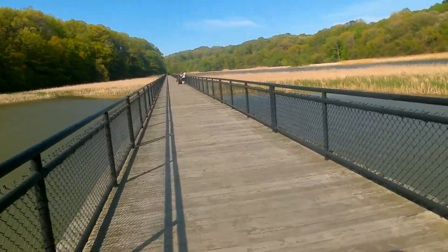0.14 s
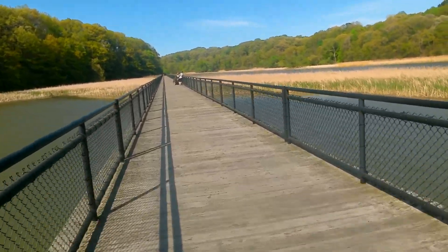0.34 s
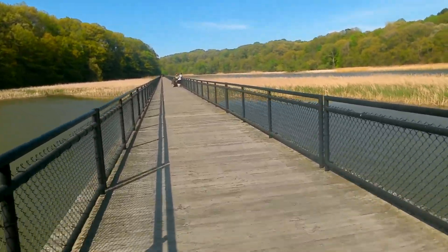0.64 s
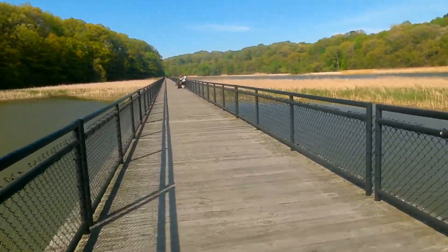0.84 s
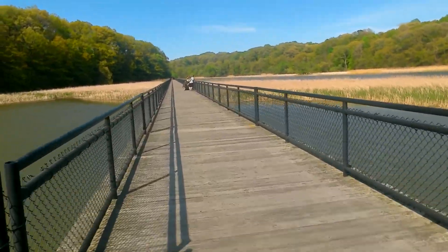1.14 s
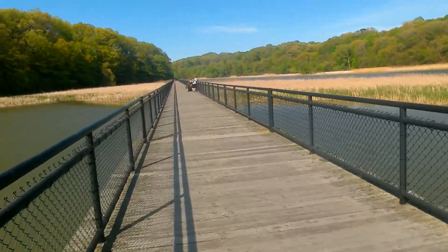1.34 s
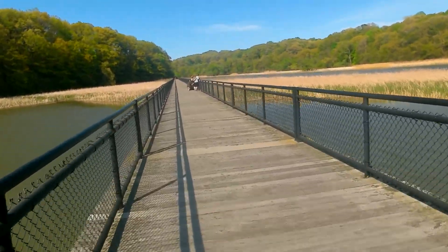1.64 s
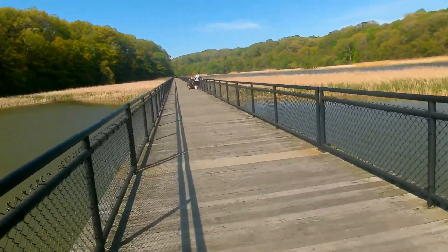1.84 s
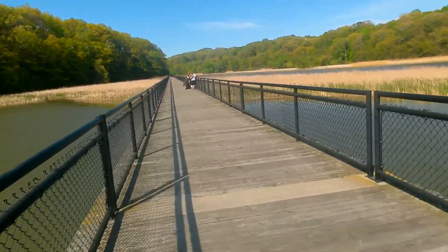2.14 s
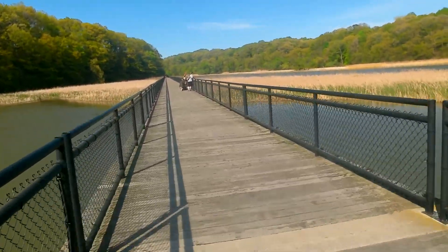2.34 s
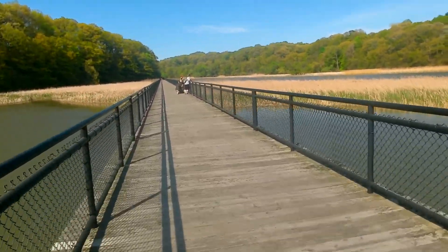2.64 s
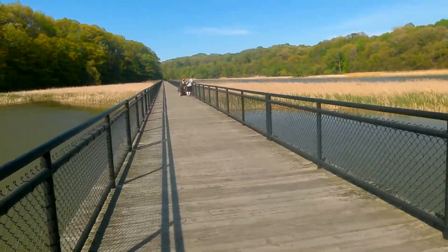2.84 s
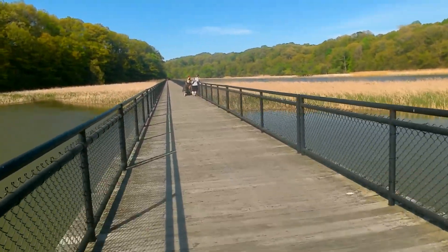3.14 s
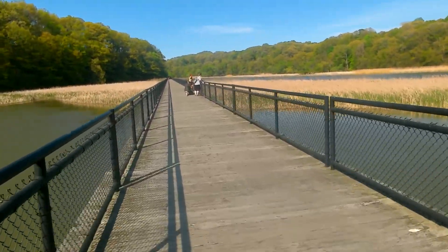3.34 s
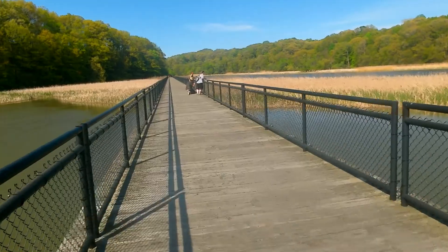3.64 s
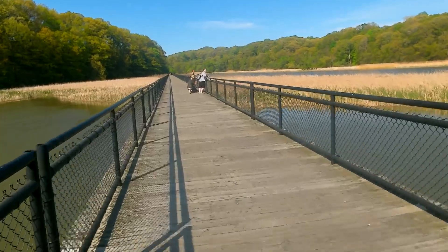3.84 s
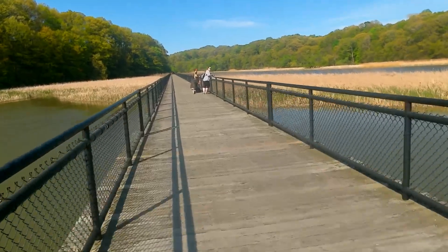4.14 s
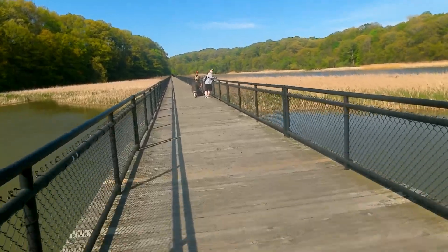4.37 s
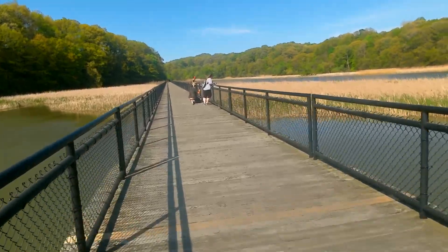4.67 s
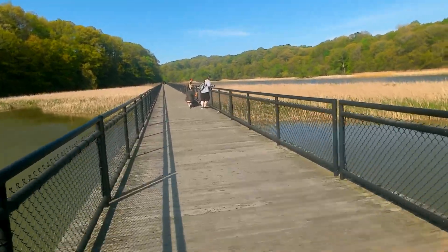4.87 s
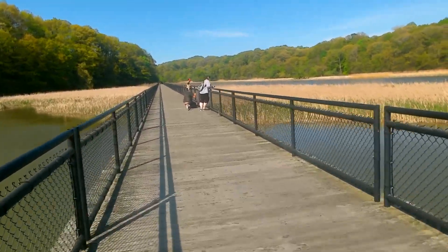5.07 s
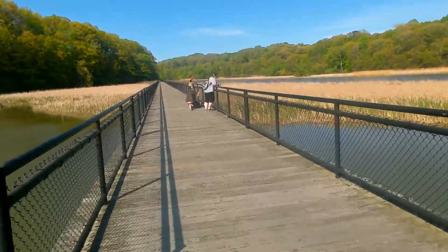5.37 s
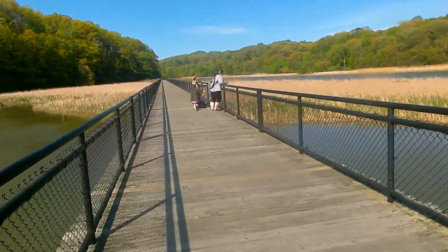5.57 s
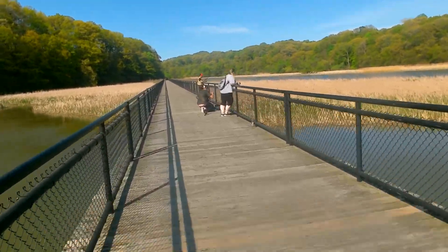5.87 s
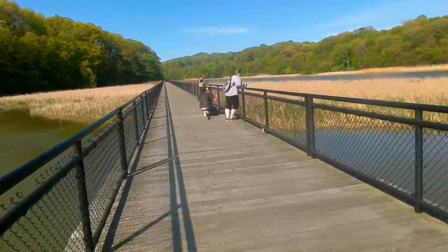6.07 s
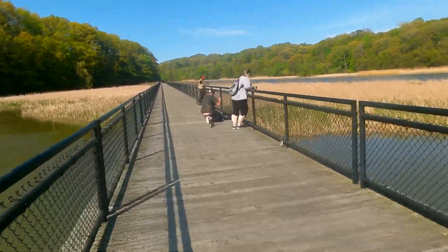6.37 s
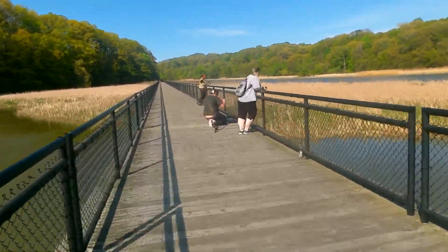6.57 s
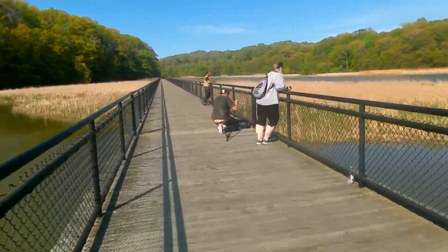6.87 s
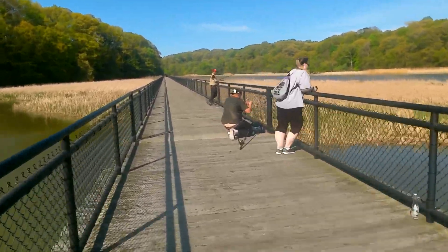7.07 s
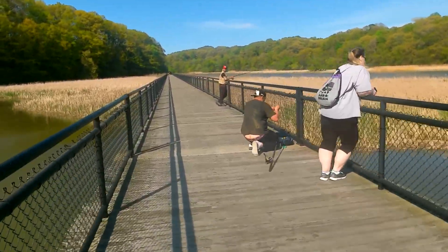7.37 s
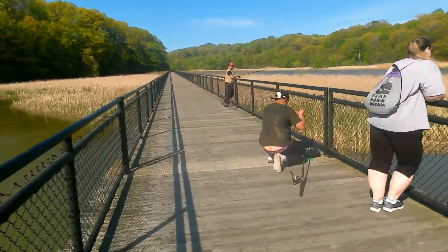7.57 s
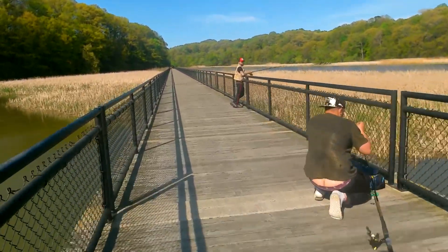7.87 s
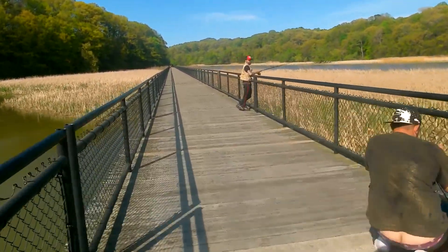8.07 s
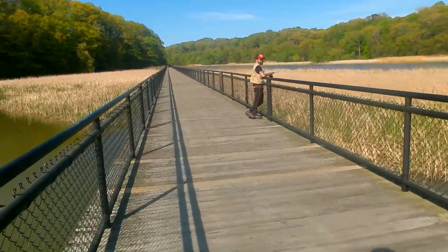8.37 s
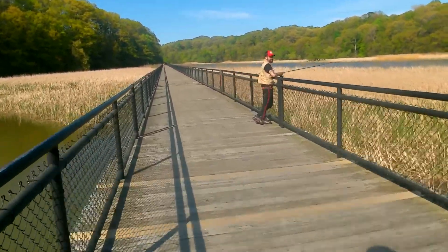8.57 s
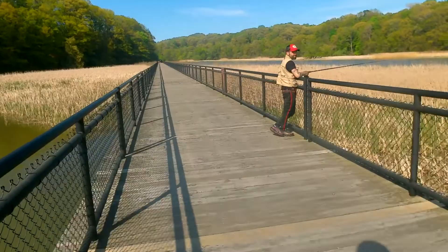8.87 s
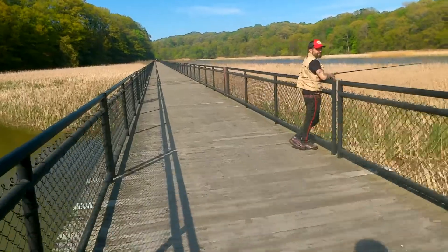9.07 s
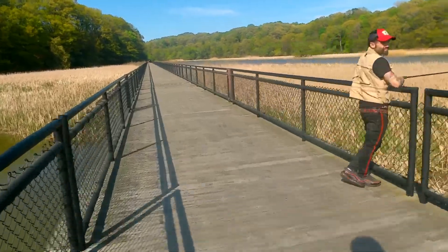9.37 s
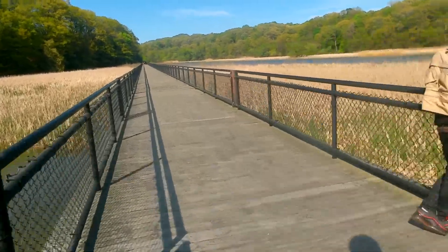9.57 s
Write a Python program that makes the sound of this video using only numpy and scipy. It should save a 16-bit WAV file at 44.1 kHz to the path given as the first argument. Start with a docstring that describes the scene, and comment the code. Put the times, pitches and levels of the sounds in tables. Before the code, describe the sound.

For about ten seconds a scooter rolls steadily over a wooden boardwalk, heard from a microphone on board. A low, hollow plank drumming and rough tyre roar run throughout, slightly easing later, while gusting wind rumbles deeply, strong near 2 s. Thumps cluster at 0.5-0.9 s; sharp wooden slaps follow around 2 s, frame thuds at 2.8-3.4 s and a heavy boom at 4.3 s. Dull steering knocks and tiny metallic ticks scatter throughout, with short rattles near 1.4, 5.1 and 8.8 s. Around 4.6-5.3 s a thin hiss and faint falling bird trill swell and fade. Isolated faint whistles appear near 2.1, 3.3, 5.1, 6.6 and 7.4-8.2 s. A barely audible, very high whine flickers at 6.2 s. Thuds continue around 6.2-7.8 s, a strong clack hits at 8.7 s, and hard slaps and booms come at 9.4-9.6 s.

```python
"""Wheels drum over wooden planks and thump on the raised ones while wind buffets the microphone.
A scooter rolls at a steady pace along a boardwalk over a marsh: shaped noise and ringing planks.
Its loose parts clack, tick and rattle: damped modes and noise scraped through resonances.
Behind: a thin hiss, a brief high whine, faint bird whistles and a trill, all but the hiss gliding sines."""
import sys
import numpy as np
from scipy import signal
from scipy.fft import rfft, irfft, next_fast_len
from scipy.io import wavfile
from scipy.ndimage import uniform_filter1d, minimum_filter1d, map_coordinates

SR = 44100
rng = np.random.default_rng(int(sys.argv[2]) if len(sys.argv) > 2 else 0)


def dump(signal):
    """Clip the signal to [-1, 1] and save it as 16-bit WAV at the path in sys.argv[1]."""
    limited = np.clip(np.atleast_2d(signal).T, -1, 1)
    pcm = np.round(limited * 32767).astype(np.int16)
    wavfile.write(sys.argv[1], SR, pcm)


N = 428211


def amp(db):
    """Decibels to gain."""
    return 10 ** (np.asarray(db) / 20)


def unit(x):
    """Scaled to rms 1."""
    return x / np.sqrt(np.mean(x ** 2) + 1e-20)


def crest(x):
    """Scaled to peak 1."""
    return x / (np.abs(x).max() + 1e-20)


def smooth(x, size):
    """Two moving averages of size samples in a row."""
    return uniform_filter1d(uniform_filter1d(x, size=size), size=size)


def add(track, start_s, sound):
    """Mix a sound into the track at start_s."""
    part = track[max(round(start_s * SR), 0):][:len(sound)]
    part += sound[:len(part)]


def curve(rows, outside=None):
    """Per-sample line through (s, value) rows; beyond them the end values, or outside if given."""
    s, value = np.transpose(rows)
    return np.interp(np.arange(N) / SR, s, value, left=outside, right=outside)


def wobble(rate_hz):
    """A smooth random curve, rate_hz knots a second."""
    knots = rng.standard_normal(int(N * rate_hz / SR) + 4)
    return map_coordinates(knots, [np.arange(N) * rate_hz / SR])


def tone(hz):
    """Sine that follows a per-sample frequency."""
    return np.sin(2 * np.pi * np.cumsum(hz) / SR)


def coloured(x, spectrum, size=8192):
    """x through a causal minimum-phase filter with the gain of the (Hz, dB) points."""
    hz, db = np.transpose(spectrum)
    bin_hz = np.fft.rfftfreq(size, 1 / SR)
    log_gain = np.log(amp(np.interp(np.log(bin_hz + 1), np.log(hz), db)))
    # folding the cepstrum onto positive times makes the filter causal
    cepstrum = irfft(log_gain)
    cepstrum[1:size // 2] *= 2
    cepstrum[size // 2 + 1:] = 0
    return signal.fftconvolve(x, irfft(np.exp(rfft(cepstrum))))[:len(x)]


def resonate(x, hz, width_hz):
    """x through one resonance."""
    return signal.lfilter(*signal.iirpeak(min(hz, SR / 3), hz / width_hz, SR), x)


def pressure(t, t60_s, rise_s):
    """Force of a contact: it builds as the parts press together, then dies away."""
    return amp(-60 * t / t60_s) * (1 - np.exp(-(t / rise_s) ** 2))


def burst(t, t60_s, rise_s):
    """The noise of one contact."""
    return rng.standard_normal(len(t)) * pressure(t, t60_s, rise_s)


def ringing(modes, t, stiffness, rise_s):
    """Damped modes, pitched by stiffness and struck a little differently each time; peak 1."""
    ring = np.zeros(len(t))
    for hz, db, t60_s in modes:
        decay = amp(db + rng.normal(0, 1.6) - 60 * t / t60_s)
        ring += decay * np.sin(2 * np.pi * hz * stiffness * t)
    return crest(ring * (1 - np.exp(-t / rise_s)))


def bumps(rate_hz, spread_db):
    """Impulses at random moments, rate_hz a second on average, of uneven size."""
    hits = rng.random(N) < rate_hz / SR
    return hits * amp(spread_db * np.clip(rng.standard_normal(N), -2, 2))


def chatter(blows, t60_s):
    """Envelope of the short bursts that a run of impulses shakes out; rms 1."""
    energy = signal.lfilter([1], [1, -amp(-120 / (t60_s * SR))], blows ** 2)
    return unit(np.sqrt(energy))


def strays(rate_hz, db, spread_db):
    """Small jolts at random moments, about rate_hz a second: rows of (s, dB, random colour around 0)."""
    chance = rng.standard_normal((100, 3))
    times_s = np.cumsum(np.exp(.7 * chance[:, 0])) / (1.28 * rate_hz)  # 1.28: mean of the gaps
    level_db = db + spread_db * np.clip(chance[:, 1], -2, 1)
    return np.column_stack([times_s, level_db, chance[:, 2]])[times_s < N / SR]


def rolling():
    """Plank edges drum the deck and roughen the tyre roar; the fittings jiggle on their own; all grow with the
    level."""
    # How hard the wheels work the deck. Each row: time in seconds, level in dB.
    effort_rows = [(0, -18), (0.45, -21.5), (0.7, -18.5), (0.82, -20), (1.1, -21), (1.8, -20.5),
                   (2.15, -18), (2.7, -21.5), (3.3, -20.5), (3.95, -23.5), (4.3, -21.5), (5.0, -21),
                   (5.95, -24), (6.3, -22), (7.2, -24), (7.7, -22), (8.15, -24.5), (9.3, -25.5),
                   (9.71, -20.5)]
    # Deck drumming. Each row: frequency in Hz, gain in dB.
    drum_spectrum = [(30, -41), (75, -17), (106, 3.5), (135, -2.5), (170, 0), (290, -2), (400, -8.5),
                     (600, -16), (1000, -31), (2500, -61), (6000, -120)]
    # Tyre roar. Each row: frequency in Hz, gain in dB.
    tyre_spectrum = [(100, -41), (330, -6.5), (560, 0), (700, -4), (900, -5.5), (1250, -13.5),
                     (1500, -18.5), (1780, -23.5), (1950, -25), (2400, -37.5), (3500, -45.5), (8000, -79.5)]
    # Tyre hiss. Each row: frequency in Hz, gain in dB.
    hiss_spectrum = [(800, -36), (2400, -5.5), (3200, 1.5), (4500, -2), (5300, -1), (6200, -4.5),
                     (7000, -10), (9000, -10), (12000, -12.5), (15500, -14)]
    cruise_db = -21
    board_rate_hz, board_depth_db = 12, 1.21  # smoother and rougher boards
    drum_db, tyre_db, hiss_db = -21.5, -29, -62  # at the cruising level
    drum_growth, tyre_growth, hiss_growth = 0.95, 0.81, 0.44  # dB per dB of effort
    jiggle_db, grit_db = 2, -3  # re hiss

    effort_db = curve(effort_rows) - cruise_db + board_depth_db * wobble(board_rate_hz)
    edges = seams(rate_hz=27, scatter=.4, spread_db=3.5)

    knocks = unit(edges - edges.mean())
    drum = unit(coloured(rng.standard_normal(N) + 0.19 * knocks, drum_spectrum))
    drum = unit(drum + .5 * planks(edges, low_hz=136.5, high_hz=367.9, t60_s=0.26))

    tread = (chatter(edges, t60_s=0.18) + 1.02) * rng.standard_normal(N)
    plank_tones = planks(edges, low_hz=415.8, high_hz=1001.0, t60_s=0.22)
    roar = unit(unit(coloured(tread, tyre_spectrum)) + 0.34 * plank_tones)

    hiss = unit(coloured(rng.standard_normal(N), hiss_spectrum))
    shaking = chatter(bumps(rate_hz=48, spread_db=7.0), t60_s=0.095) * amp(5.1 * np.tanh(wobble(21)))
    jiggle = unit(fitting(shaking, bright_db=-19.5))
    grit = crackle(rate_hz=42, spread_db=4.5, low_hz=2000, high_hz=6260, t60_s=0.016)
    treble = hiss + amp(jiggle_db) * jiggle + amp(grit_db) * grit

    return (amp(drum_db + drum_growth * effort_db) * drum
            + amp(tyre_db + tyre_growth * effort_db) * roar
            + amp(hiss_db + hiss_growth * effort_db) * treble)


def seams(rate_hz, scatter, spread_db):
    """One impulse for each plank edge that the front and the rear wheel cross."""
    count, wheel_lag_s = 800, .18
    chance = rng.standard_normal((count, 3))
    rear_s = (np.arange(count) + scatter * chance[:, 0]) / rate_hz
    front_s = rear_s - wheel_lag_s
    height_db = spread_db * np.clip(chance[:, 1], -2, 1.5)
    at = (np.concatenate([rear_s, front_s]) * SR).astype(int)
    sizes = amp(np.concatenate([height_db, height_db + chance[:, 2]]))
    return np.bincount(at[at >= 0], sizes[at >= 0], N)[:N]


def planks(edges, low_hz, high_hz, t60_s):
    """Each crossed edge rings briefly at a random pitch of its own; rms 1."""
    out, t = np.zeros(N), np.arange(SR // 6) / SR
    fade = amp(-60 * t / t60_s)
    pitches_hz = rng.uniform(low_hz, high_hz, size=1600)
    for at, hz in zip(np.flatnonzero(edges), pitches_hz):
        add(out, at / SR, edges[at] * fade * np.sin(2 * np.pi * hz * t))
    return unit(out)


def crackle(rate_hz, spread_db, low_hz, high_hz, t60_s):
    """Grains of grit pop under the tyres, each at its own pitch; rms 1."""
    out, t = np.zeros(N), np.arange(SR // 40) / SR
    pops = bumps(rate_hz, spread_db)
    for at in np.flatnonzero(pops):
        hz = rng.uniform(low_hz, high_hz)
        pop = resonate(burst(t, t60_s, rise_s=0.00018), hz, width_hz=1400)
        add(out, at / SR, pops[at] * crest(pop))
    return unit(coloured(out, [(1500, -6), (2500, 3), (6000, -6.0), (7200, -7.5), (14000, -10.0)]))


def thumps():
    """A raised plank cracks and slaps, rings the frame and booms the deck; stiffness lifts ring and slap."""
    # Wheels hitting raised planks. Each row: start in seconds, frame ring in dB, deck boom in dB,
    # wooden slap in dB, stiffness as a pitch ratio.
    hits = [(0.087, -8, -24, -31, 0.9), (0.561, -16, -11, -18, 1.13), (0.576, -18, -13, -31, 0.97),
            (0.619, -13, -14, -41, 0.88), (0.665, -7, -14, -17, 0.69), (0.693, -9.5, -18, -15.5, 1.01),
            (0.728, -6.5, -20, -14.5, 0.94), (0.753, -3, -23, -24, 0.74), (0.855, -21, -12.5, -30, 0.86),
            (1.154, -16, -27, -16, 0.96), (1.418, -15, -28, -20, 1.05), (1.432, -16, -19, -22, 0.97),
            (1.972, -11.5, -27, -16.5, 1.17), (1.985, -7.5, -26, -12, 1), (2.018, -14, -27, -4, 0.93),
            (2.04, -13, -18, -21, 0.96), (2.147, -19, -33, -11, 1), (2.177, -23, -32, -17, 1.06),
            (2.192, -11, -24, -15.5, 1), (2.815, -11, -17, -13, 0.66), (2.852, -8, -17, -17, 0.69),
            (3.085, -2.5, -16, -7.5, 1), (3.101, 2.5, -18, -10, 0.85), (3.268, -17, -16, -17, 0.79),
            (3.312, -4.5, -11, -24, 0.71), (3.346, -5.5, -15, -35, 0.587), (3.417, -17, -30, -32.5, 0.91),
            (3.793, -10.5, -18, -19, 0.86), (4.283, -7.5, -7, -19, 0.78), (4.345, -13.5, -14.5, -27, .75),
            (5.509, -24, -13, -38, .7), (5.564, -15, -17, -17.5, 0.86), (6.188, -5.5, -9.5, -29, .95),
            (6.315, -15, -28, -17, 1.14), (6.374, -17, -28, -17, 1.12), (6.642, -11.5, -22, -20, 1.05),
            (6.723, -30, -16.5, -29, 0.82), (6.829, -14, -16, -15, 0.8), (6.864, -8, -15, -25, 0.63),
            (6.905, -11.5, -15, -28, 1.4), (7.053, -19, -25, -18.5, 0.85), (7.081, -15, -18, -19, 0.9),
            (7.476, -2.5, -31, -16.5, 1.09), (7.492, -18, -26, -22, 1.08), (7.666, -5.5, -18, -24, 1.11),
            (7.678, -14, -16, -18, 0.99), (7.768, -15, -14, -33, 0.95), (8.397, -11, -30, -20.5, 0.69),
            (8.733, -20, -15, -41, 0.53), (8.96, -12, -35, -22, 1.02), (9.028, -14, -26, -40, 0.73),
            (9.13, -13, -29, -22, 1.1), (9.196, -19, -19, -34, .7), (9.408, -13.5, -30, -10, 0.96),
            (9.417, -6.5, -28, -13, 0.95), (9.429, -16.5, -17, -15, 1.4), (9.438, -20, -4.5, -23, 1.1),
            (9.591, -3, -11, -8.5, 1.05), (9.597, -19, -8, -8.5, 1.27), (9.617, -21, -12, -18, 1.27)]
    # Frame modes at stiffness 1. Each row: frequency in Hz, mean level in dB, t60 in seconds.
    frame_modes = [(170, -4, 0.11), (248.3, 3, 0.071), (309.7, 0, 0.093), (353, -9.5, 0.081),
                   (438, -5, 0.057)]
    # Plank modes at stiffness 1. Each row: frequency in Hz, mean level in dB, t60 in seconds.
    plank_modes = [(475, 0.5, 0.063), (670.5, -6, 0.088), (858, -2.5, 0.072), (1125, -10, 0.052)]
    # Slap noise at stiffness 1. Each row: frequency in Hz, gain in dB.
    slap_spectrum = [(150, -21.5), (430, 1.5), (620, 9.5), (880, 3), (1250, -11.5), (1900, -22),
                     (2500, -36), (6000, -49), (15000, -77)]
    # First contact with a plank's edge. Each row: frequency in Hz, gain in dB.
    crack_spectrum = [(200, -12), (700, 5.5), (1200, 2.5), (2000, -20), (2800, -32), (5500, -35.5),
                      (10000, -50.5), (15000, -59)]
    boom_lag_s = 0.0084  # the deck gives way after the slap
    crack_db, plank_share = -9, .85  # crack re slap, plank ring re scuff

    out, t = np.zeros(N), np.arange(SR // 4) / SR
    for start_s, ring_db, boom_db, slap_db, stiffness in hits:
        ring = ringing(frame_modes, t, stiffness, rise_s=.002)
        boom_hz = 102 * rng.normal(1, 0.088)
        boom = np.sin(2 * np.pi * boom_hz * t) * amp(-60 * t / 0.082) * (1 - np.exp(-t / 0.0039))
        scuff_spectrum = [(hz * stiffness, db) for hz, db in slap_spectrum]
        scuff = crest(coloured(burst(t, t60_s=.052, rise_s=.0028), scuff_spectrum))
        slap = crest(scuff + plank_share * ringing(plank_modes, t, stiffness, rise_s=0.0021))
        crack = crest(coloured(burst(t, t60_s=0.011, rise_s=0.00065), crack_spectrum))
        add(out, start_s, amp(ring_db) * ring + amp(slap_db) * (slap + amp(crack_db) * crack))
        add(out, start_s + boom_lag_s, amp(boom_db) * crest(boom))
    return out


def clacks():
    """Play in the steering column gives short, dull knocks with a gritty edge, brighter on higher ones."""
    # Loudest knocks. Each row: start in seconds, level in dB ahead of the ring and grit gains,
    # nominal pitch in Hz, nominal t60 in seconds.
    loud = [(0.375, -19.5, 1200, .022), (0.855, -16.5, 930, 0.04), (0.884, -21, 1350, 0.023),
            (1.082, -15.5, 755, 0.031), (1.32, -18, 790, 0.048), (1.364, -17.5, 1080, 0.15),
            (1.4, -17.5, 800, .025), (1.684, -16, 770, 0.017), (1.973, -11, 790, .014),
            (2.105, -23.5, 1390, .022), (2.235, -24, 960, .022), (2.438, -17.5, 736, 0.027),
            (2.647, -23.5, 910, 0.019), (2.975, -15, 880, 0.027), (2.998, -18.5, 1430, 0.065),
            (3.064, -18, 795, 0.022), (3.434, -17, 765, 0.018), (3.854, -19, 1270, .022),
            (4.491, -28, 766, .022), (4.643, -17, 850, 0.015), (5.126, -20, 875, 0.025),
            (5.326, -23.5, 1360, 0.023), (5.597, -15.5, 755, 0.023), (5.707, -21, 1130, 0.02),
            (5.931, -23.5, 845, 0.016), (6.113, -19, 734, .022), (6.376, -17, 900, 0.027),
            (6.876, -19.5, 1070, 0.024), (6.906, -19, 880, 0.017), (7.024, -20, 1170, 0.018),
            (7.2, -21, 790, .022), (7.299, -20, 790, 0.015), (7.501, -14, 1040, 0.016),
            (7.583, -21.5, 1300, 0.027), (7.864, -12.5, 890, 0.052), (7.904, -26.5, 1350, 0.02),
            (8.09, -22.5, 840, 0.045), (8.448, -14.5, 1155, 0.02), (8.473, -13.5, 710, 0.02),
            (8.538, -16.5, 950, 0.023), (8.588, -21, 1130, 0.045), (8.655, -22.5, 1250, 0.049),
            (8.704, -8.5, 1010, 0.024), (8.714, -21, 990, .025), (8.778, -22, 1100, .03),
            (8.823, -22, 1200, 0.034), (9.335, -18, 1140, 0.041), (9.6, -20, 1150, 0.018)]
    # Column modes. Each row: ratio to the nominal pitch, mean level in dB, share of the nominal t60.
    column_modes = [(.68, -8, 0.93), (1, 6, 0.88), (1.329, -6, .7), (1.85, -21, 0.34)]
    # Grit of a knock of 1000 Hz nominal pitch. Each row: frequency in Hz, gain in dB.
    grit_spectrum = [(300, -19.5), (800, 1), (1300, -3.5), (1800, -15.5), (2300, -24), (4000, -36.5),
                     (8000, -56)]
    ring_db, grit_db = -4.5, -4.5
    soft_hz, soft_t60_s = 867, .022  # lesser knocks in between

    out, t = np.zeros(N), np.arange(SR // 8) / SR
    soft = [(start_s, db, soft_hz * np.exp(.2 * colour), soft_t60_s)
            for start_s, db, colour in strays(rate_hz=1.6, db=-27, spread_db=4)]
    for start_s, db, hz, t60_s in loud + soft:
        modes = [(hz * ratio, mode_db, t60_s * share) for ratio, mode_db, share in column_modes]
        knock = ringing(modes, t, 0.95, rise_s=.0012)
        spectrum = [(f * np.sqrt(hz / 1000), gain_db) for f, gain_db in grit_spectrum]
        grit = crest(coloured(burst(t, t60_s=1.25 * t60_s, rise_s=.001), spectrum))
        add(out, start_s, amp(db) * (amp(ring_db) * knock + amp(grit_db) * grit))
    return out


def fitting(force, bright_db, pitch=1):
    """A loose metal part scraped by a force envelope: broad resonances and a bright edge."""
    # Resonances at pitch 1. Each row: frequency in Hz, width in Hz, gain in dB ahead of the body filter.
    resonances = [(1360, 640, 11), (2013, 160, 16.5), (2880, 2160, 6.5), (3910, 860, 9), (4000, 330, 1),
                  (5490, 900, 12), (6500, 500, -20.5)]
    # Bright edge. Each row: frequency in Hz, gain in dB.
    edge_spectrum = [(2000, -28), (5500, 5), (7200, -8), (8700, 1.5), (11000, -6.5), (13000, -18),
                     (16000, -8)]
    scrape, fizz = force * rng.standard_normal((2, len(force)))
    body = np.zeros(len(force))
    for k, (hz, width_hz, db) in enumerate(resonances):
        body += (-1) ** k * amp(db) * resonate(scrape, hz * pitch, width_hz)
    body = coloured(body, [(500, -6.5), (1400, 12.5), (6200, -4.5), (7500, -5), (15000, -18.0)])
    return unit(body) + amp(bright_db) * unit(coloured(fizz, edge_spectrum))


def ticks():
    """Metal fittings jump, snap back and stutter to rest; the lean tilts them from clank to ping."""
    # Loudest clicks. Each row: start in seconds, peak in dB ahead of the lean filter,
    # bright edge re body in dB, lean from dull clank to thin ping in dB.
    clicks = [(0.274, -30.5, -23.5, -2), (0.401, -32, -21, -6), (0.569, -23, -17, -1),
              (0.587, -32.5, -19.5, -2), (0.676, -35, -21, 2), (0.75, -28, -22.5, -3),
              (0.799, -26, -14.5, 5), (0.882, -30.5, -22, -4), (1.06, -34, -18.5, -2), (1.287, -36, -17, 4),
              (1.336, -19.5, -19.5, 0.5), (1.360, -22, -20.5, 2.5), (1.512, -28, -24, -1),
              (1.538, -31.5, -17.5, -7), (1.551, -32.5, -15, -2), (1.571, -35, -18, -1),
              (1.733, -29, -24, -3), (1.970, -36.5, -21, 3), (2.098, -28.5, -28.5, 2),
              (2.27, -35.5, -16.5, -1), (2.445, -33, -26, -4), (2.523, -28, -19, 2), (2.696, -31, -16, 2.5),
              (3.003, -35, -25, -10), (3.087, -23, -10, -2), (3.141, -31.5, -13.5, 1),
              (3.311, -39.5, -18, 3), (3.548, -36.5, -12.5, 6), (3.855, -36, -24.5, -1),
              (3.984, -32, -23.5, -2), (4.098, -36, -12.5, 0), (4.505, -38.5, -17.5, 4),
              (4.723, -34.5, -12.5, 5), (4.887, -30, -17, 0), (4.912, -33.5, -11, 0),
              (4.924, -33.5, -3.5, 1), (5.2, -35, -14, 1), (5.363, -38, -14, 5), (5.465, -24, -15, 1),
              (5.659, -26, -18.5, 2), (5.738, -28, -25, -5), (5.927, -34.5, -21, -7),
              (6.205, -40, -21.5, -3), (6.253, -32.5, -13.5, 6), (6.278, -35, -16, 1),
              (6.373, -33.5, -24, -3), (6.582, -38.5, -6.5, -2), (6.702, -35, -16, -8),
              (7.298, -35, -21.5, 2), (7.349, -23.5, -15.5, 2), (7.49, -42.5, -3.5, 2),
              (7.498, -37, -20, 1), (7.533, -29.5, -18, 2), (7.73, -40, -24, -6), (7.859, -40.5, -22, -7),
              (7.911, -33.5, -21.5, 0), (7.986, -45, -19, 16), (8.407, -30.5, -26, 0),
              (8.471, -36.5, -22, -1), (8.53, -28.5, -22, 3), (8.776, -33.5, -18, -2),
              (8.801, -31, -17.5, 4), (8.809, -34.5, -14.5, 7), (8.821, -31, -15.5, 1),
              (9.335, -30.5, -27, -4), (9.410, -32, -14.5, 4), (9.600, -28.5, -19, -1)]
    settle_share, pitch_spread = .045, .06  # spread in log pitch

    out, t = np.zeros(N), np.arange(SR // 10) / SR
    stutter = chatter(bumps(rate_hz=130, spread_db=4), t60_s=.012)
    snap = pressure(t, t60_s=.015, rise_s=.0018)
    settle = pressure(t, t60_s=.12, rise_s=0.0045)
    for start_s, db, bright_db, lean_db in clicks:
        settling = stutter[round(start_s * SR):][:len(t)] * settle
        pitch = np.exp(pitch_spread * rng.standard_normal())
        click = crest(fitting(snap + settle_share * settling, bright_db, pitch))
        add(out, start_s, amp(db) * coloured(click, [(2000, -lean_db), (5500, lean_db), (8000, 0)]))
    return out


def rattles():
    """A loose part shivers in short runs of rapid contacts."""
    # Runs of contacts. Each row: start in seconds, length in seconds, level in dB.
    runs = [(0.736, 0.039, -53), (1.353, .04, -45), (1.515, 0.062, -41.5), (5.055, 0.068, -47.5),
            (6.335, 0.039, -47.5), (8.384, 0.063, -48), (8.707, .025, -45), (8.79, 0.045, -46),
            (9.406, 0.028, -43.5), (9.581, 0.049, -43)]
    drive = np.zeros(N)
    for start_s, length_s, db in runs:
        add(drive, start_s, amp(db) * signal.windows.tukey(int(length_s * SR), .4))
    contacts = chatter(bumps(rate_hz=260, spread_db=0), t60_s=0.025)
    return drive * unit(fitting(contacts, bright_db=-20.0))


def wind():
    """Eddies tumble over the microphone port as low noise; the strongest are eased slightly."""
    # Wind on the microphone. Each row: time in seconds, level in dB ahead of the buffeting gain.
    wind_rows = [(0, -23), (0.6, -21.5), (1.15, -27), (1.5, -22), (1.75, -31), (2.0, -18.5), (2.55, -24.5),
                 (3.6, -20.5), (3.95, -26.5), (4.3, -21.5), (5.1, -21.5), (5.35, -27), (6.2, -22),
                 (6.6, -24), (7.1, -21), (8.05, -27), (8.3, -22), (8.55, -27.5), (8.75, -23), (9.0, -23),
                 (9.2, -27), (9.65, -24)]
    # Eddy noise. Each row: frequency in Hz, gain in dB.
    eddy_spectrum = [(8, -20), (22, -0.5), (35, -2.5), (47, 1), (70, -4), (120, -7.5), (200, -13.5),
                     (400, -24), (1000, -57.5), (3000, -110)]
    buffet_db, gust_rate_hz, gust_db = 1.5, 8.8, 0.4
    eddies = unit(coloured(rng.standard_normal(N), eddy_spectrum))
    swell = np.sqrt(np.abs(smooth(eddies ** 2, size=2200)))
    level_db = curve(wind_rows) + buffet_db + gust_db * wobble(gust_rate_hz)
    return amp(level_db) * unit(eddies / (swell + 7.1))


def rush():
    """A thin, soft hiss swells once and fades: band-shaped noise."""
    # Swell of the hiss. Each row: time in seconds, level in dB.
    swell_rows = [(4.55, -89), (4.75, -66), (5.0, -58.5), (5.15, -62), (5.35, -79)]
    spectrum = [(1500, -29.0), (2800, 2.0), (4400, -7.0), (5300, 4.5), (6000, -9.5), (7500, -23.5)]
    return amp(curve(swell_rows, outside=-120)) * unit(coloured(rng.standard_normal(N), spectrum))


def whine():
    """A very high, thin, slightly unsteady tone sounds once, briefly."""
    # The tone. One row: start in seconds, length in seconds, mean frequency in Hz, peak in dB.
    start_s, length_s, hz, db = (6.203, .103, 14430, -71)
    out, count = np.zeros(N), int(length_s * SR)
    sine = tone(hz + 40 * wobble(300)[:count])
    add(out, start_s, amp(db) * signal.windows.tukey(count, .15) * sine)
    return out


def whistles():
    """Thin bird whistles from far off: sines on arching glides."""
    # Bird whistles. Each row: start in seconds, length in seconds, start in Hz, end in Hz,
    # arch of the glide in Hz, peak in dB.
    calls = [(2.13, 0.024, 4600, 4780, 60, -56), (3.33, 0.036, 4600, 5300, 130, -59),
             (5.102, 0.012, 4000, 3900, 42, -47), (6.641, 0.014, 5300, 5150, 80, -55),
             (7.443, 0.04, 6050, 5060, 170, -60), (7.842, 0.065, 5450, 5250, 220, -65),
             (8.02, .045, 5500, 5500, 120, -68), (8.122, 0.039, 3050, 2600, 0, -59)]
    out = np.zeros(N)
    for start_s, length_s, start_hz, end_hz, arch_hz, db in calls:
        u = np.linspace(0, 1, int(length_s * SR))
        glide_hz = start_hz + (end_hz - start_hz) * u + arch_hz * np.sin(np.pi * u)
        glide_hz += 70 * wobble(250)[:len(u)]
        add(out, start_s, amp(db) * signal.windows.tukey(len(u), .5) * tone(glide_hz))
    return out


def trill():
    """A far bird's fast run of falling notes swells and fades: one sine, swept down on each note."""
    # Swell of the trill. Each row: time in seconds, level in dB.
    swell_rows = [(4.6, -80), (4.8, -66), (5.0, -63), (5.15, -69), (5.3, -79)]
    notes_per_s, high_hz, low_hz = 14, 5600, 4920
    note_phase = (np.arange(N) / SR * notes_per_s + 0.12 * wobble(12)) % 1
    hz = high_hz + (low_hz - high_hz) * note_phase + 130 * wobble(500)
    return amp(curve(swell_rows, outside=-120)) * np.sin(np.pi * note_phase) * tone(hz)


def scene():
    """Everything as it reaches the one microphone."""
    scooter = rolling() + thumps() + clacks() + ticks() + rattles()
    return (scooter + wind() + rush() + whine() + whistles() + trill())[None]


def record(dry):
    """A limiter holds down the highest peaks; a band limit removes the top of the treble."""
    ceiling, top_hz = .72, 15800
    needed = ceiling / np.maximum(np.abs(dry), ceiling)
    gain = smooth(minimum_filter1d(needed, size=441), size=220)
    size = next_fast_len(N + SR // 2)
    passband = np.fft.rfftfreq(size, 1 / SR) < top_hz
    return irfft(rfft(dry * gain, size) * passband, size)[..., :N]


dry = scene()
out = record(dry)
dump(out)
```